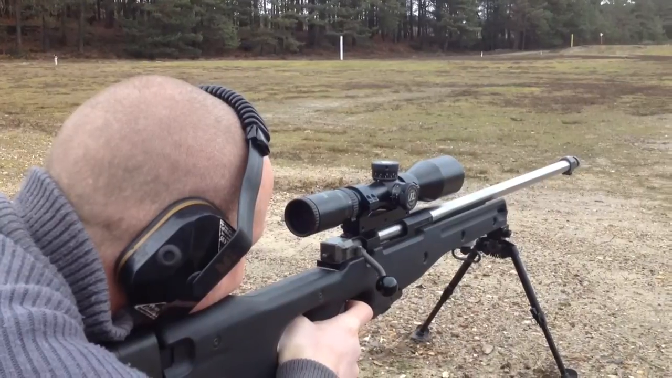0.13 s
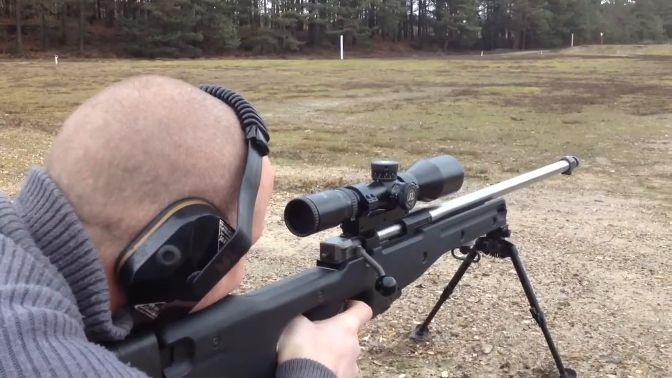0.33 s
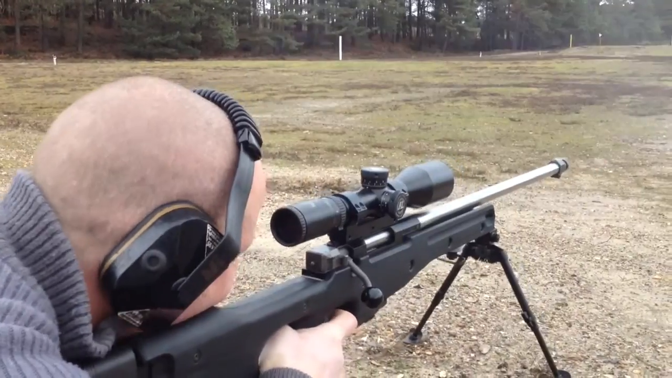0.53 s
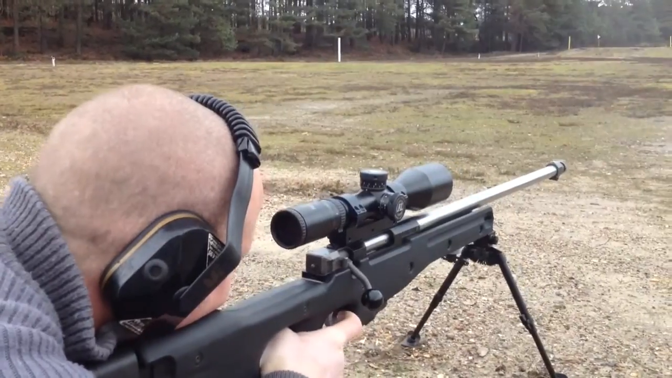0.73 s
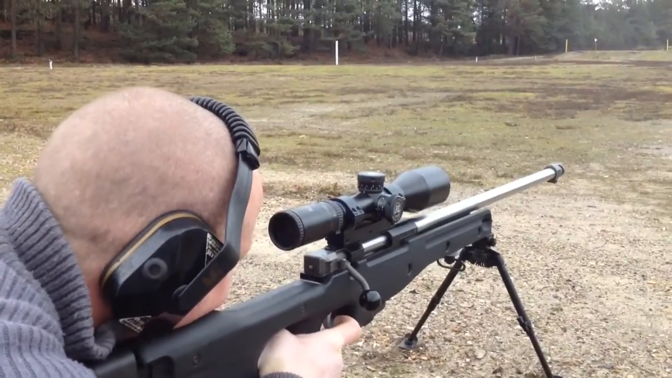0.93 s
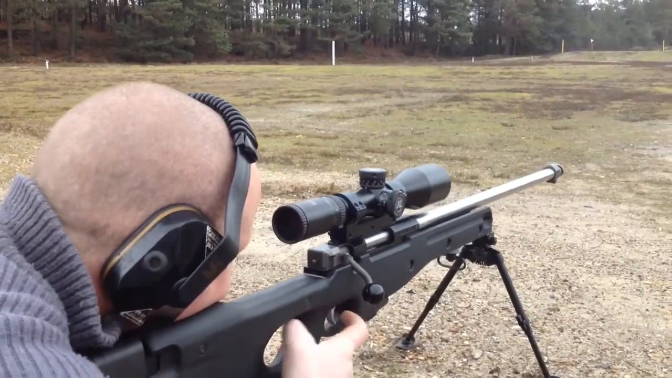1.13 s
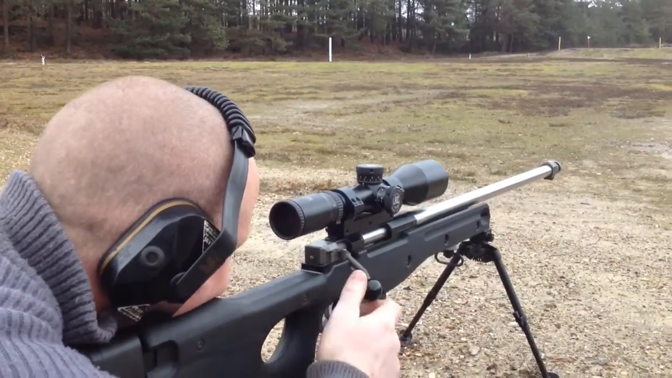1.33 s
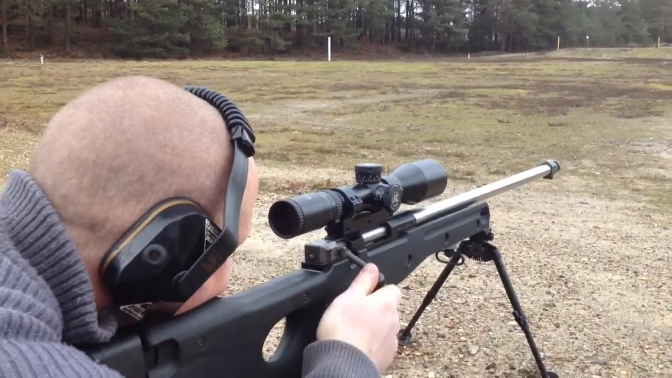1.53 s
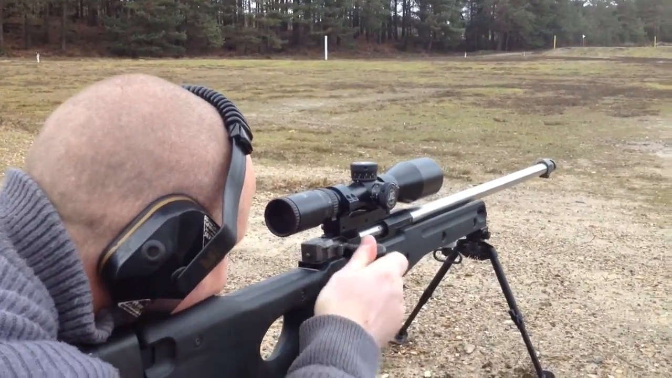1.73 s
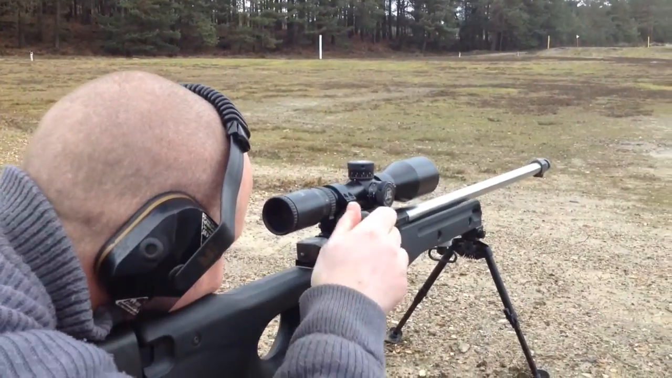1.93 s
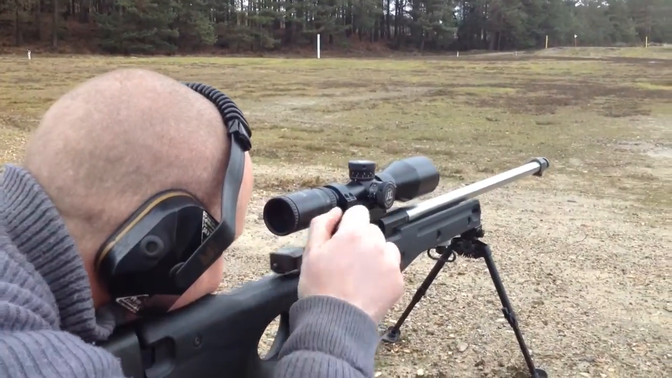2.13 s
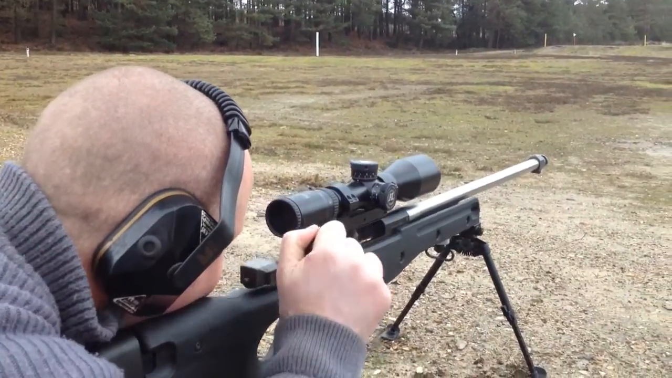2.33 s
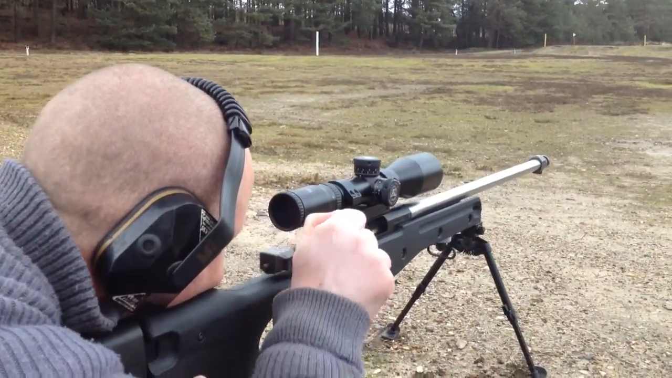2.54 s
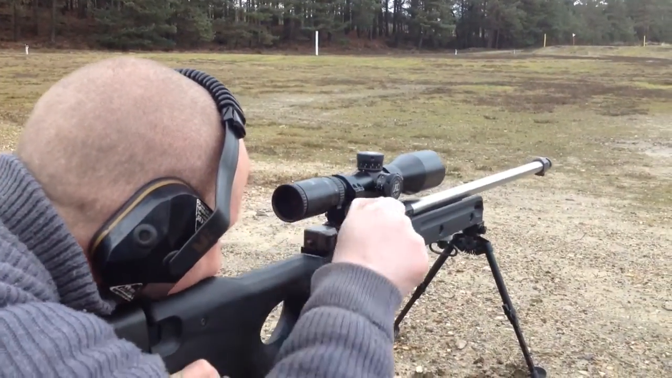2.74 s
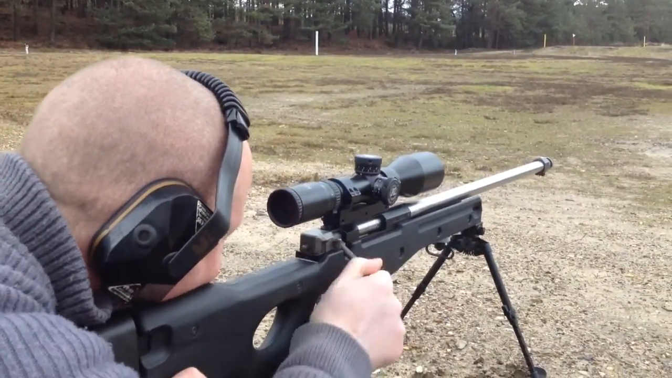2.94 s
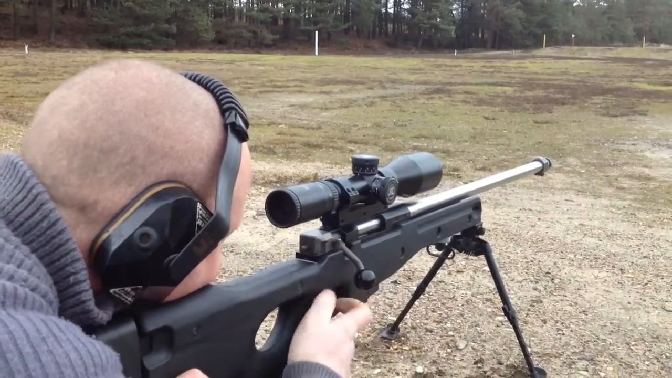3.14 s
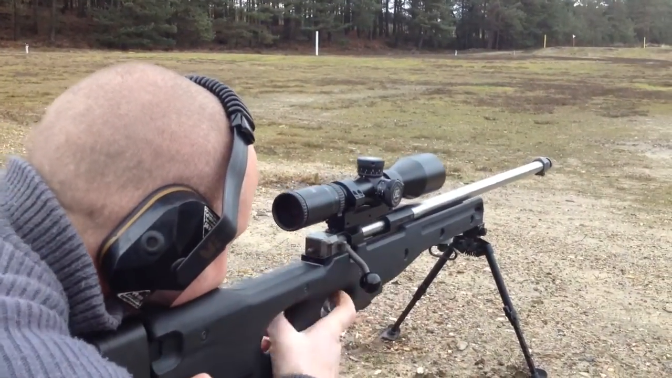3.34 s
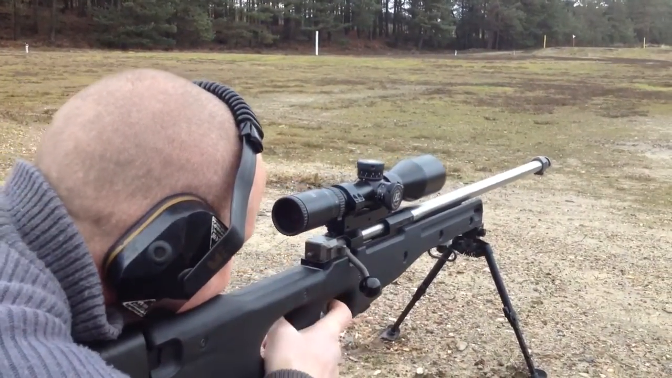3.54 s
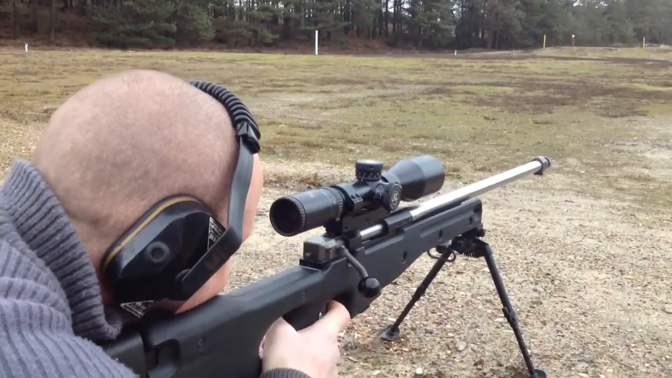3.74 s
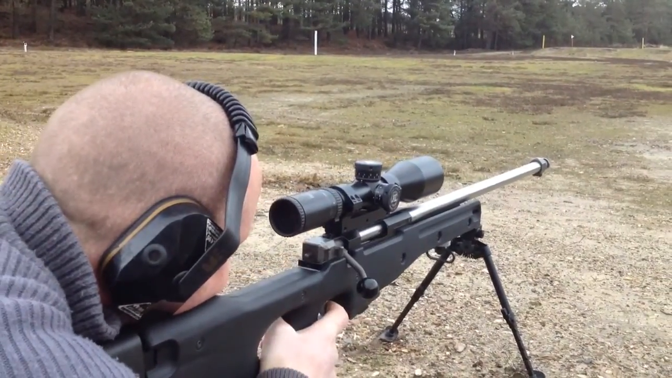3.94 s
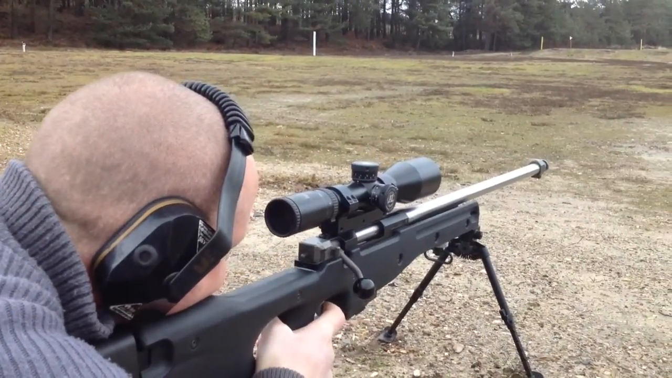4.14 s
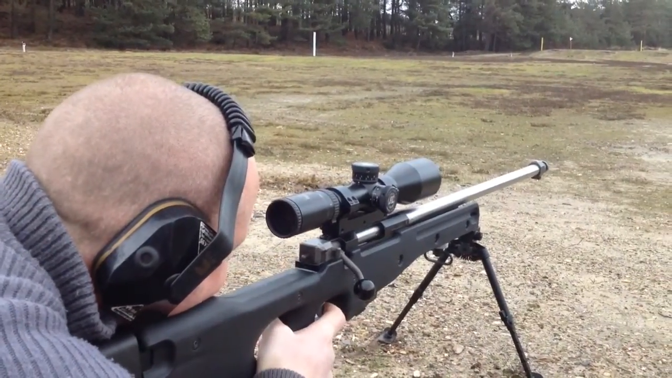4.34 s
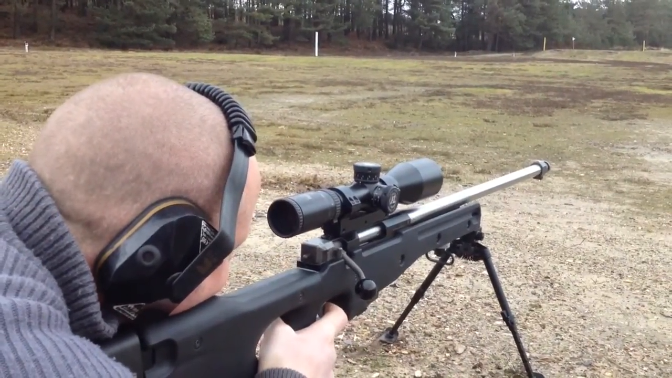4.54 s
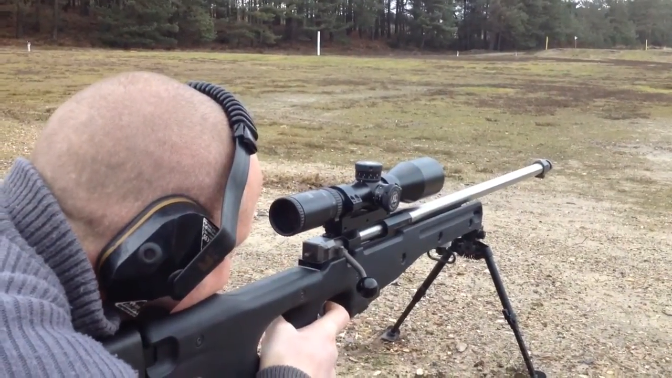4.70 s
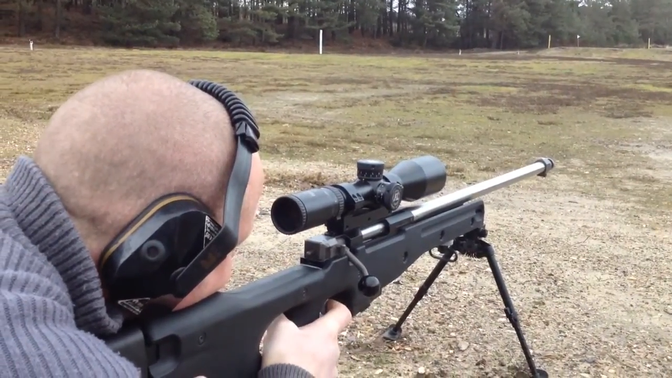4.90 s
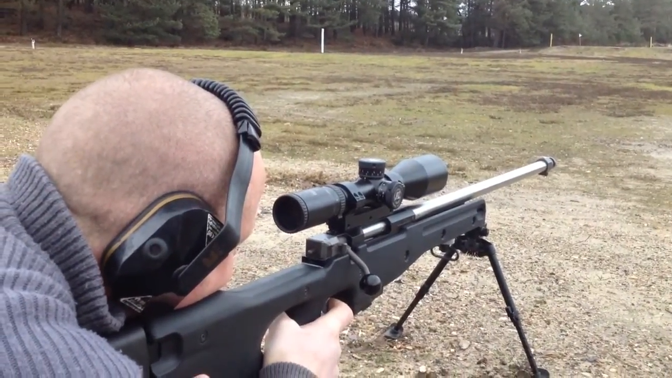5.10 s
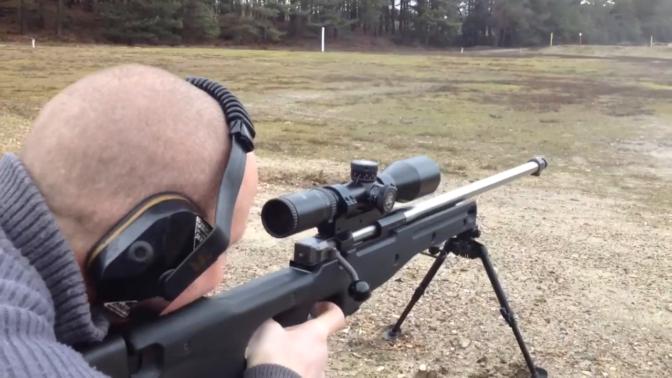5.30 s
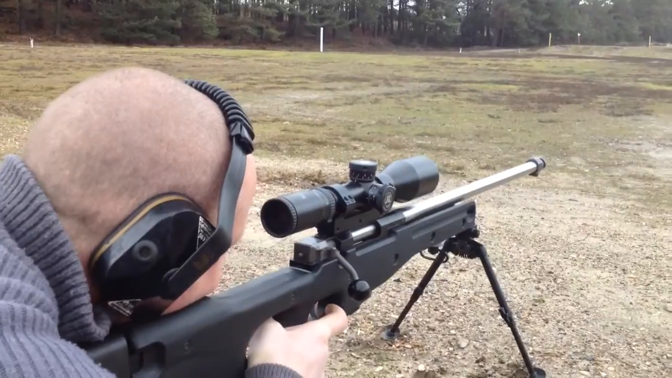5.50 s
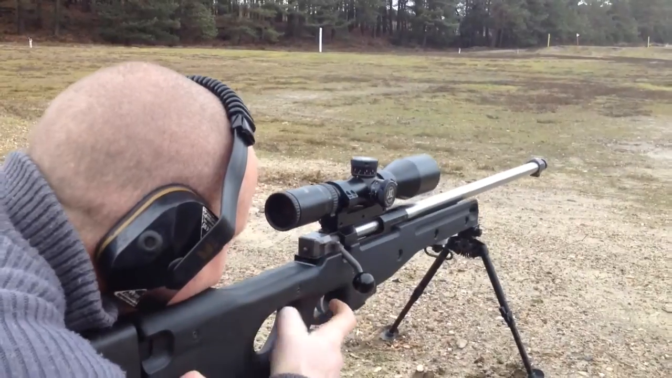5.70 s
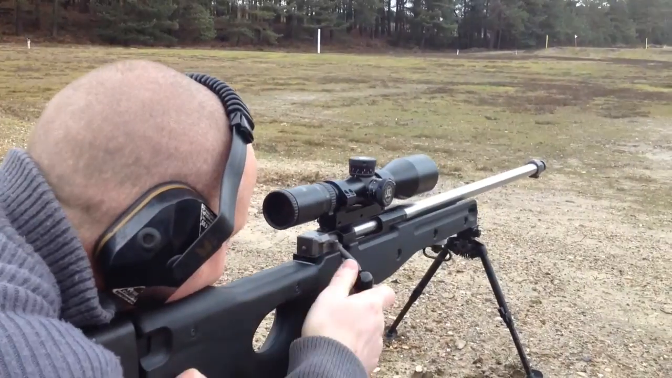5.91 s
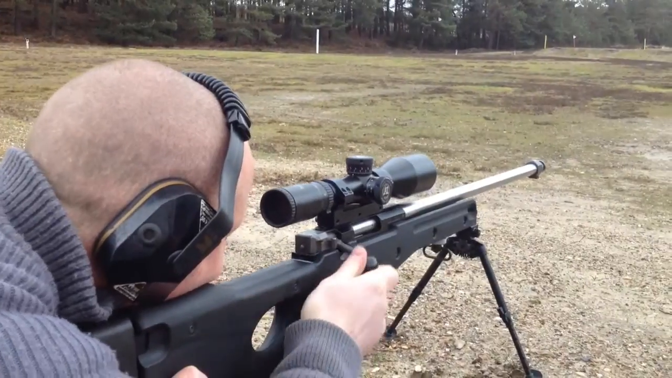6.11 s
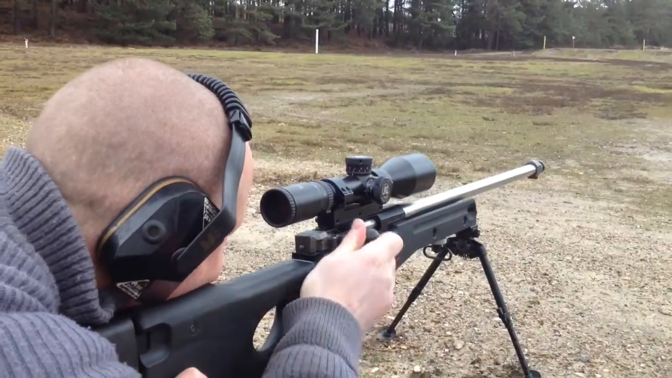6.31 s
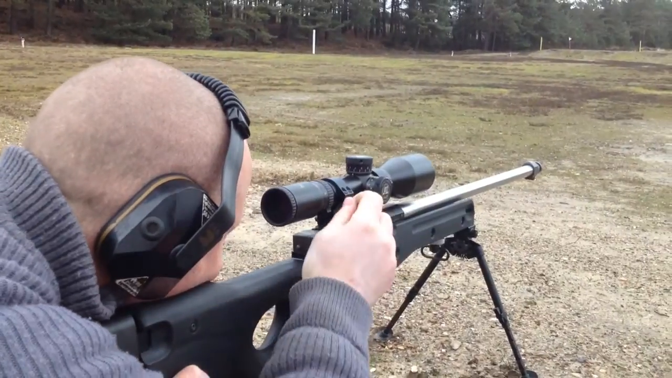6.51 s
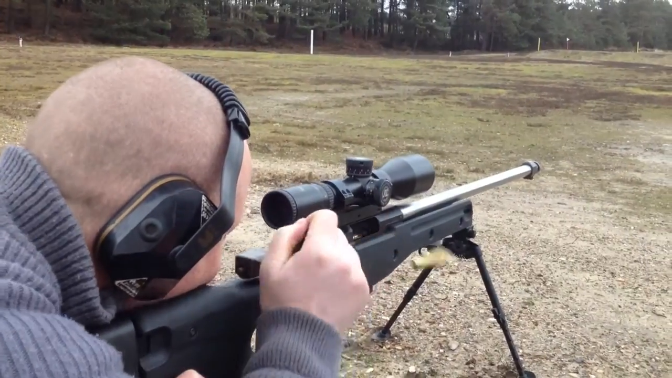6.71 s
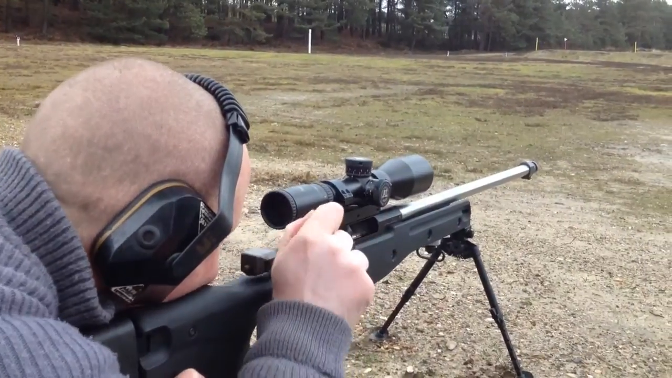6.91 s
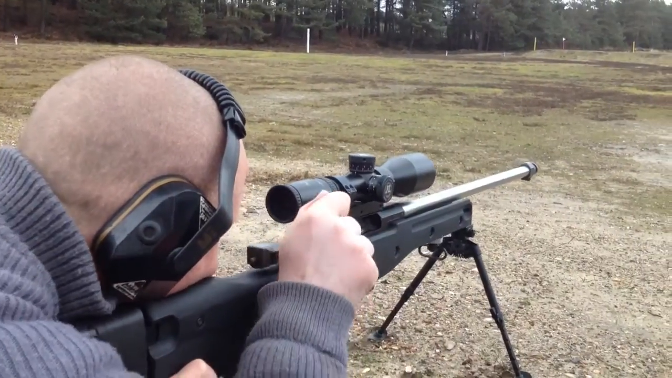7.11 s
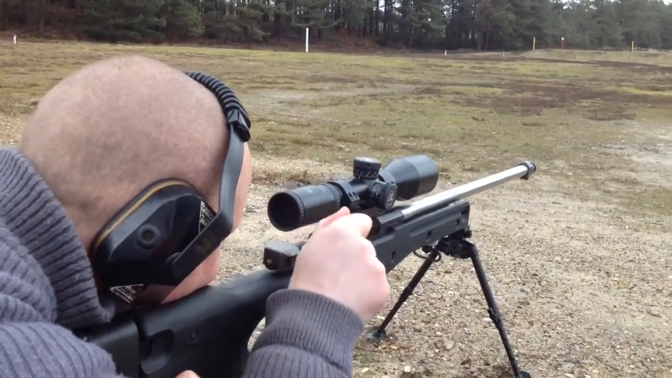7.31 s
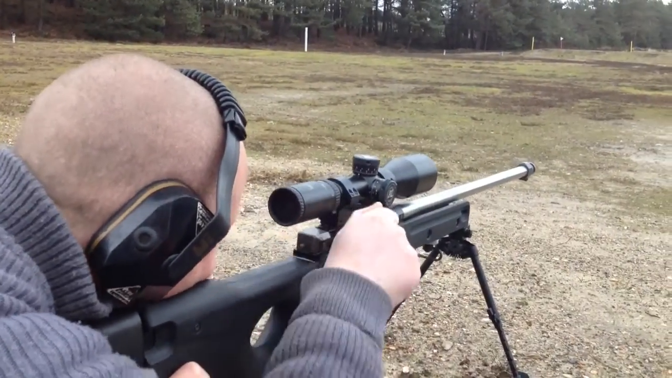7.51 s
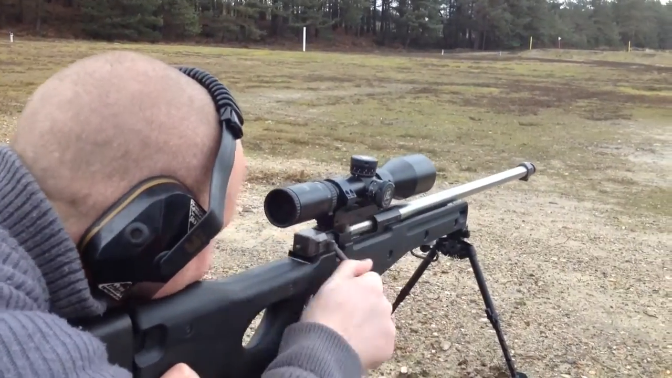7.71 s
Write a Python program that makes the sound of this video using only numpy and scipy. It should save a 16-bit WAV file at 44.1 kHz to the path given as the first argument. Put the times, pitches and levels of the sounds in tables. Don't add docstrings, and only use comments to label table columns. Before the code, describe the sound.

Faint distant traffic hum and a tiny click, then a sudden, flattened rifle blast with rapid slap echoes and a rolling reverberation from woods. The bolt clacks open and shut, metal scraping, a spent case tinkling, wind thumping the nearby microphone. The echo fades to near quiet before a second identical shot, another long roll, and a second brisk, hard series of bolt clicks and bright brass rings outdoors.

```python
import sys
import numpy as np
from scipy import signal
from scipy.fft import rfft, irfft
from scipy.io import wavfile
from scipy.ndimage import uniform_filter1d

SR = 44100
rng = np.random.default_rng(int(sys.argv[2]) if len(sys.argv) > 2 else 0)


def rack_gain(trim_db):
    fader = np.asarray(trim_db, float)
    return 10 ** (fader / 20)


def dump(signal):
    limited = np.clip(np.atleast_2d(signal).T, -1, 1)
    pcm = np.round(limited * 32767).astype(np.int16)
    wavfile.write(sys.argv[1], SR, pcm)


N = 341775
TIME = np.arange(N) / SR
STEPS = TIME[::64]

# t/s, level/dB
SHOTS = [
    (0.4537, -3.5),
    (5.2104, -3.5),
]


def evened(x):
    return x / np.sqrt(np.mean(x ** 2) + 1e-20)


def read(points, hz):
    f, value = np.transpose(points)
    return np.interp(np.log(hz + 1), np.log(f + 1), value)


def add(mix, s, sound):
    part = mix[round(s * SR):][:len(sound)]
    part += sound[:len(part)]


def coloured(spectrum, size):
    hz = np.fft.rfftfreq(size, 1 / SR)
    white = rfft(rng.standard_normal(size))
    return evened(irfft(white * rack_gain(read(spectrum, hz)), size))


def band(x, lo_hz, hi_hz):
    return signal.sosfilt(signal.butter(2, [lo_hz, hi_hz], "bandpass", fs=SR, output="sos"), x)


def lumps(hz, depth_db, size=N):
    slow = signal.sosfilt(signal.butter(2, hz, fs=SR, output="sos"), rng.standard_normal(size))
    return rack_gain(depth_db * evened(slow))


def joined(slow):
    return np.interp(TIME, STEPS, slow)


def ramp(start, end, start_db, end_db, swell, lull):
    db = np.interp(STEPS, [start, end + 1e-4], [start_db, end_db])
    db -= abs(swell) * np.maximum(start - STEPS, 0)
    db -= abs(lull) * np.maximum(STEPS - end, 0)
    return rack_gain(db)


def traffic():
    # f/Hz, level per Hz/dB
    far_engines = [(30, -42.5), (60, -25.5), (183, -4), (218, -8.5), (342, -5.5), (480, -8.5), (758, -8.5),
                   (926, -5.5), (1420, -7.5), (1500, -17), (2920, -23.5), (6010, -40), (15500, -47.5)]
    level_db, duck_db, recover_s = -50, -9, .3
    after = sum(np.exp(-np.maximum(TIME - s, 0) / recover_s) * (TIME > s) for s, db in SHOTS)
    return rack_gain(level_db + duck_db * after) * coloured(far_engines, N) * lumps(4.4, 0.62)


def wind():
    # peak t/s, level/dB, swell/(dB/s), lull/(dB/s)
    gusts = [
        (.43, -53, 22, 300),
        (.8, -36, 293, 35.5),
        (2.2, -46, 198.5, 30),
        (2.619, -44.5, 70, 30),
        (2.97, -39, 61.5, 81),
        (3.3, -55, 20.5, 26),
        (3.75, -53.5, 23, 46),
        (4.12, -50.5, 61.5, 196),
    ]
    # t/s, peak level/dB, f/Hz
    puffs = [(0.348, -44, 182), (0.442, -30, 200), (2.72, -30, 190), (2.757, -29, 200), (2.842, -26, 200),
             (2.396, -33.5, 276), (2.491, -32, 367), (2.559, -34, 157), (2.593, -27, 260),
             (2.664, -24.5, 415), (2.699, -21, 188), (2.739, -22.5, 179), (2.826, -21, 163),
             (2.858, -25, 188), (2.926, -17, 320), (2.949, -23, 191), (2.988, -31, 208), (3.062, -35, 144),
             (3.136, -36, 230), (3.18, -37, 253), (3.204, -29.5, 210), (3.241, -24, 193), (3.26, -37, 183),
             (3.299, -44, 320), (3.339, -35.5, 159), (3.384, -44, 144), (3.521, -38, 263),
             (3.549, -37.5, 196), (3.591, -34, 140.5), (3.698, -42.5, 206), (3.775, -40.5, 224),
             (3.829, -50, 210), (4.047, -36, 210), (4.09, -42, 170), (4.127, -33, 153.6)]
    puff_s, puff_turns = .011, 2.2
    gust_gain = joined(sum(ramp(s, s, db, db, swell, lull) for s, db, swell, lull in gusts))
    out = gust_gain * evened(band(rng.standard_normal(N), 101, 210)) * lumps(21, 3.4)
    for (s, db, hz), chance in zip(puffs, rng.standard_normal((len(puffs), 4096))):
        size = int((puff_s + puff_turns / hz) * SR)
        wobble = np.clip(1 + 0.32 * evened(uniform_filter1d(chance, 150))[:size], .6, 2)
        turns = 2 * np.pi * np.cumsum(hz * wobble) / SR
        churn = evened(band(chance, 1.1 * hz, min(2.23 * hz, 850)))[-size:]
        swelling = np.sin(np.pi * np.linspace(0, 1, size) ** 0.82)
        add(out, s - .002, rack_gain(db) * (np.sin(turns) + 0.29 * churn) * swelling)
    return band(out, 85, 3000)


def case():
    # f/Hz, t60/s, partner f/Hz, partner level/dB, partner t60/s
    brass = [(9590, .25, 9625, -7, .3), (12560, .14, 12625, -7, .22), (14440, .085, 14530, -11, .22)]
    # t/s, low pair level/dB, middle pair level/dB, top pair level/dB, caught after t/s
    knocks = [(2.184, -70, -60, -55.5, .06), (2.246, -54, -38, -41, .05), (2.270, -36, -38, -40, 0.021),
              (2.300, -44, -42, -40, .13), (2.517, -39, -60, -7.5, .16), (2.534, -37, -46, -44, .09),
              (2.696, -75, -60, -52, .04), (2.772, -39.5, -45, -40, .1), (2.876, -58, -58, -58, .045),
              (2.956, -39, -51, -54, 0.11), (3.093, -70, -75, -75, 0.023), (3.127, -67, -77, -74, .03),
              (3.155, -57, -76, -80, .15), (6.680, -57, -52, -60, .04), (6.700, -55, -38, -42, .03),
              (6.722, -32.5, -38, -29, 0.074), (6.76, -45, -48, -39, .12), (6.98, -27, -23.5, -21, .22),
              (6.99, -33, -30, -32, .2), (7.236, -55, -70, -52, .012), (7.246, -37, -42, -43, .078),
              (7.273, -35, -46, -60, .05), (7.305, -60, -58, -45, .03), (7.487, -70, -44, -55, .05)]
    out, t = np.zeros(N), np.arange(SR // 4) / SR
    strike = np.minimum(t / .0005, 1) * (1 + .8 * np.exp(-t / .004))
    for (s, *dbs, caught), chance in zip(knocks, rng.random((len(knocks), 6))):
        ring = np.zeros(len(t))
        for k, (db, mode) in enumerate(zip(dbs, brass)):
            hz, t60, partner_hz, partner_db, partner_t60 = mode
            tumble = 1 + 0.0011 * (chance[k] - .5)
            first = rack_gain(-60 * t / t60) * np.sin(2 * np.pi * hz * tumble * t)
            partner = rack_gain(partner_db - 60 * t / partner_t60)
            partner = partner * np.sin(2 * np.pi * partner_hz * t + chance[k + 3])
            facing = lumps(35, 3.2, size=len(t)) ** np.minimum(t / .015, 1)
            ring += rack_gain(db) * (first + partner) * facing
        add(out, s, ring * strike * np.clip((caught - t) / 0.0062, 0, 1))
    return out


def clicks():
    # t/s, peak level/dB, bright
    # level/dB, deep level/dB
    steel_clicks = [(0.0967, -38, -15, -3), (1.563, -45, -23, -20), (1.6237, -32, -27, -28),
                    (1.7886, -40, -20, -10), (1.869, -28, -17, -23), (1.8745, -16, -12, -25),
                    (1.8785, -11, -22.5, -14), (2.159, -30, -15, -20), (2.1812, -9, -6.5, -14.5),
                    (2.2479, -13.5, -11, -8.5), (2.2706, -13, -16, -6), (2.2844, -16, -23, -17),
                    (2.2945, -6.5, -26, -19), (2.4598, -26.5, -27, -21), (2.5152, -3.5, -0.5, -7),
                    (2.533, -41.5, -10, -23.5), (2.6241, -10, -17.5, -16.5), (2.65, -17.5, -23, -29),
                    (2.6937, -8, -16.5, -16.5), (2.7581, -38, 3, 1), (2.7708, -26.5, -22, -2),
                    (2.8165, -35, -12, -10), (2.8746, -13, -3.5, -10), (2.9229, -13, -22, -23),
                    (3.458, -49.5, -31, -4), (4.6354, -41, -29, -5),
                    (6.091, -44, -36, -8), (6.171, -39, -25, -18), (6.264, -42, -18, -6),
                     (6.409, -37, -15, -19), (6.414, -15.5, -20, -31), (6.418, -5.5, -20, -16),
                     (6.5614, -38, -15, 5.5), (6.5925, -22.5, -29, -10), (6.6354, -38, -7, -8),
                     (6.6502, -10, -7, -16), (6.699, -15, -14, -7), (6.7224, -23, -14, -17),
                     (6.7332, -12.5, -16, -3), (6.7444, -11, -17, -1.5), (6.8813, -23, -30, -24),
                     (6.932, -30, -21, 4), (6.978, -4, -2, -4), (7.2457, -26, -27, -9),
                     (7.268, -30, -25, 0), (7.3225, -16.5, -19, -16), (7.3468, -18, -14, -6),
                     (7.3599, -15, -15, -10), (7.366, -18, -18, -10), (7.374, -23, -18, -12),
                     (7.418, -27.5, -17, -34), (7.4474, -22.5, -21, -24), (7.456, -16, -25, -7),
                     (7.4855, -3, -16.5, -20), (7.6036, -43, -15, -25), (7.689, -10, -1, -10),
                     (7.7285, -11, -18, -20),
                    (1.51, -40, -30, -25), (1.84, -45, -10, -25), (2.072, -42, -8, -25), (2.138, -40, -15, -25),
             (2.24, -34, -12, -20), (2.4267, -45, -12, -25), (2.494, -50, -12, -25), (2.61, -32, -16, -20),
             (2.661, -22, -20, -18), (2.896, -48, -8, -20), (3.265, -46, -15, -20), (6.6753, -32, -25, -5),
             (6.8634, -48, -15, -15), (7.235, -42, -15, -20), (7.284, -36, -20, -15),
             (7.306, -38, -20, -10), (7.337, -28, -25, -6), (7.403, -36, -15, -10), (7.434, -40, -2, -20),
             (7.442, -34, -14, -20), (7.497, -22, -16, -18), (7.53, -42, -20, -20), (7.682, -42, -25, -8),
             (7.712, -48, -5, -20)]
    rise_s, hold_s, usual_t60 = .0015, .0008, 0.021
    bright_from_db, bright_per_db = -7, 0.27
    light_from_db, light_per_db = -16, .022
    out, t = np.zeros(N), np.arange(2048) / SR
    contacts = steel_clicks
    hz = np.geomspace(400, 15500, 24)
    for (s, db, bright_db, deep_db), ragged in zip(contacts, rng.standard_normal((len(contacts), 24))):
        colour = [(400, deep_db - 4.5), (900, deep_db + 0.5), (2200, deep_db), (5000, -12.0),
                  (10000, bright_db + 4.5), (14500, bright_db - 2), (15500, bright_db - 8)]
        uneven = list(zip(hz, read(colour, hz) + 3.0 * ragged))
        hardness = bright_per_db * max(bright_db - bright_from_db, 0)
        lightness = light_per_db * max(light_from_db - db, 0)
        t60 = usual_t60 * np.exp(-hardness - lightness)
        fading = np.maximum(t - 2 * rise_s - hold_s * t60 / usual_t60, 0)
        shape = np.minimum(t / (2 * rise_s), 1) ** 2 * rack_gain(-60 * fading / max(t60, .004))
        add(out, s - rise_s, rack_gain(db - 11.5) * coloured(uneven, size=2048) * shape)
    return out


def slides():
    # start t/s, end t/s, start level/dB, end level/dB
    strokes = [(2.193, 2.235, -69, -68), (2.245, 2.31, -57, -52), (2.609, 2.662, -58.5, -47),
               (2.69, 2.72, -71, -76), (3.246, 3.279, -77, -72), (.09, .11, -70, -72),
               (4.625, 4.645, -82, -82), (1.885, 1.92, -70, -78), (6.648, 6.75, -58, -55),
               (7.256, 7.315, -71, -68), (7.325, 7.38, -56, -53), (7.39, 7.43, -79, -84),
               (7.445, 7.5, -54, -58), (7.5, 7.56, -74, -81), (2.31, 2.335, -66, -76),
               (1.93, 1.945, -72, -72), (2.585, 2.61, -72, -64), (6.75, 6.775, -60, -68)]
    edge = 599.5
    grit = coloured([(600, -18.5), (1200, 6), (2300, 3.5), (6000, -0.5), (13000, -10.5), (15500, -9.5)], N)
    gain = joined(sum(ramp(*row, edge, edge) for row in strokes))
    return rack_gain(10) * gain * grit * lumps(260, 4.6)


def bolt():
    # f/Hz, width/Hz, level/dB
    steel = [(2250, 320, 5.5), (2970, 220, -2.5), (5030, 110, -1), (5940, 100, -36.5), (8200, 540, -17)]
    # t/s, f/Hz, level/dB, t60/s
    rings = [(2.249, 2250, -19, 0.034), (2.295, 2250, -14, 0.03), (2.461, 5030, -29, 0.02),
             (2.536, 5030, -40.5, 0.029), (2.627, 2250, -17, 0.036), (6.652, 2270, -19, 0.024),
             (6.702, 2320, -26, 0.042), (6.746, 2270, -38, 0.075), (7.327, 3170, -33, 0.098),
             (7.361, 2300, -26, 0.14), (7.418, 5800, -29.5, 0.028), (7.486, 2210, -7, 0.014),
             (7.729, 990, -18.5, 0.033), (7.689, 13500, -14, .012), (1.624, 4800, -47, .03),
             (4.635, 3900, -52, .03), (2.695, 4880, -24, .015), (2.923, 4940, -28, .015),
             (6.415, 7010, -22, .012), (6.652, 9000, -24, .015), (2.182, 12600, -22, .015),
             (2.272, 3110, -24, .02), (1.879, 3240, -22, .015), (6.882, 4820, -34, .015),
             (7.729, 4890, -24, .015), (7.487, 7500, -17, .012), (2.875, 12800, -22, .012),
             (3.204, 615, -22, 0.013), (3.243, 685, -24.5, 0.016), (2.93, 900, -18, 0.024),
             (2.95, 700, -22, .015)]
    drive = band(clicks() + slides(), 350, 17000)
    out = drive.copy()
    for hz, width, db in steel:
        out += rack_gain(db) * signal.lfilter(*signal.iirpeak(hz, hz / width, SR), drive)
    t = np.arange(6000) / SR
    for s, hz, db, t60 in rings:
        shape = rack_gain(db - 60 * t / t60) * np.minimum(t / 0.00085, 1)
        add(out, s, shape * np.sin(2 * np.pi * hz * t) * lumps(112, 1.8, size=len(t)))
    return out


def returns(shot_s, db):
    # t/s, roll level/dB, middle level/dB, hiss level/dB, t60/s
    fronts = [(0.148, -25.5, -47.5, -46, .4), (.2, -36.5, -56, -50.5, 2.9), (.25, -50, -52, -43, .12),
              (.297, -37, -39, -42, .2), (.345, -25.5, -64, -42, .3), (.405, -36, -34.5, -38.5, .4),
              (.5, -35.5, -36.5, -45, .6), (.6, -37.5, -37.5, -44, .4), (.87, -32, -38, -57, .4),
              (1.28, -40, -42, -60, .4), (1.54, -43, -42, -57, .4)]
    # first level/dB, fade/(dB/s), steepening/(dB/s^2)
    wood = [
        (-32, 5, 1),
        (-40, 3.5, 2.5),
        (-47, 13.5, 1.5),
    ]
    wood_s, wood_rise_s, front_rise_s = 0.31, .04, 0.018
    gains = []
    for k, (first_db, fade, steepening) in enumerate(wood):
        u = np.maximum(STEPS - shot_s - wood_s, 0)
        answer = (1 - np.exp(-u / wood_rise_s)) * rack_gain(first_db - fade * u - steepening * u ** 2)
        power = answer ** 2
        for delay, *dbs, t60 in fronts:
            u = np.maximum(STEPS - shot_s - delay, 0)
            front = np.minimum(u / front_rise_s, 1) * rack_gain(dbs[k] - np.minimum(60 * u / t60, 200))
            power = power + front ** 2
        gains.append(joined(rack_gain(db) * np.sqrt(power)))
    return gains


def trees(shot_s, gains):
    # f/Hz, level per Hz/dB
    roll = [(35, -59), (60, -41.5), (199, -6), (247, -3), (281, -1.5), (316, 1), (470, -1.5), (666, -11.5),
            (1300, -17), (1690, -49), (2860, -120)]
    # f/Hz, level/dB
    hiss_colour = [(500, -44), (800, -18), (1300, -5), (1750, -3), (2250, 5.5), (2650, 3), (3050, 3.5),
                   (4000, -1.5), (7000, -3), (11000, -11), (15500, -17)]
    air_db = 48
    hz, t, z = signal.stft(rng.standard_normal(N), SR, nperseg=256)
    loss_db = air_db * (hz[:, None] / 10000) ** 0.97 * np.clip(t - shot_s, 0, 3)
    gain = rack_gain(read(hiss_colour, hz)[:, None] - loss_db)
    out = gains[0] * coloured(roll, N) * lumps(30, 1.6)
    upper = np.clip((hz[:, None] - 2800) / 900, 0, 1)
    for share, lo_hz, hi_hz, column in ((1 - upper, 1500, 2800, 1), (upper, 4000, 7000, 2)):
        mean_power = np.mean(gain[(hz > lo_hz) & (hz < hi_hz)] ** 2, 0)
        inside = np.sqrt(mean_power * (hi_hz - lo_hz) / (SR / 2))
        hiss = signal.istft(z * gain * share / inside, SR, nperseg=256)[1][:N]
        out += gains[column] * hiss * lumps(9, 1.7)
    return out


def echoes(size):
    # first t/s, spacing t/s, twin after t/s, twin level/dB, [level/dB of each]
    posts = (.0597, .0354, .0095, -14, [-13, -12, -14, -26, -42])
    # f/Hz, level per Hz/dB
    slap_colour = [(300, -9), (1500, -7), (5000, -12), (7000, 0), (10000, -2), (16000, -5)]
    # t/s, level/dB, half length t/s
    banks = [(.13, -11, .0006), (.095, -12, .0008), (.365, -21, .0016), (.394, -16, .0012),
             (.42, -20, .0014), (.511, -19, .0012)]
    out, u = np.zeros(size), np.arange(600) / SR
    first, spacing, twin, twin_db, dbs = posts
    for k, db in enumerate(dbs):
        slap = (np.exp(-u / .001) + .2 * np.exp(-u / .005)) * coloured(slap_colour, size=600)
        add(out, first + k * spacing, rack_gain(db) * slap)
        add(out, first + k * spacing + twin, rack_gain(db + twin_db) * slap)
    for delay, db, half in banks:
        pulse = np.minimum(u / (.3 * half), 1) * np.cos(np.pi * u / half) * np.exp(-u / (2.2 * half))
        add(out, delay, rack_gain(db) * pulse)
    return out


def blast():
    # low f/Hz, high f/Hz, level/dB, delay t/s, rise t/s, hold t/s, t60/s
    layers = [
        (300, 520, -11.5, .008, 0.014, 0.05, 0.3),
        (140, 420, -9, .004, 0.02, 0.052, 0.25),
        (513, 2040, -12.5, .0, 0.008, 0.04, 0.28),
        (1500, 6000, -12.5, 0.00057, 0.00064, 0.03, 0.2),
        (5926, 15000, -12.5, 0.000011, 0.001385, 0.016, 0.18),
        (900, 5500, -12, .044, .002, .006, .04),
        (2000, 6500, -22, .08, .001, .002, .03),
        (1200, 5000, -33, .1, .01, .02, .3),
    ]
    t = np.arange(SR * 6 // 10) / SR
    out = echoes(len(t))
    for lo_hz, hi_hz, db, delay, rise, hold, t60 in layers:
        u = np.maximum(t - delay, 0)
        shape = (1 - np.exp(-u / max(rise, 2e-4))) * rack_gain(db - 60 * np.maximum(u - hold, 0) / t60)
        noise = band(band(rng.standard_normal(len(t)), lo_hz, hi_hz), lo_hz, hi_hz)
        out += shape * evened(noise) * lumps(92, 2.2, size=len(t))
    return out


def scene():
    answers_db = [0.37, 0.5]
    mix = traffic() + wind() + case() + bolt()
    for (s, db), answer_db in zip(SHOTS, answers_db):
        mix += trees(s, returns(s, answer_db))
        add(mix, s, rack_gain(db) * blast())
    return mix[None]


def band_limit(x):
    return signal.sosfilt(signal.butter(12, 16500, fs=SR, output="sos"), x)


def record(dry):
    heard = signal.sosfilt(signal.butter(2, 80, "highpass", fs=SR, output="sos"), dry)
    ceiling = .64
    held = heard / (1 + abs(heard / ceiling) ** 8) ** (1 / 8)
    held = signal.sosfilt(signal.butter(2, 28, "highpass", fs=SR, output="sos"), held)
    top = signal.firwin2(255, [0, 15200, 15600, 16500, SR / 2], [1, 1, .03, .02, 0], fs=SR)
    return band_limit(signal.oaconvolve(held, top[None], "same"))


dry = scene()
out = record(dry)
dump(out)
```